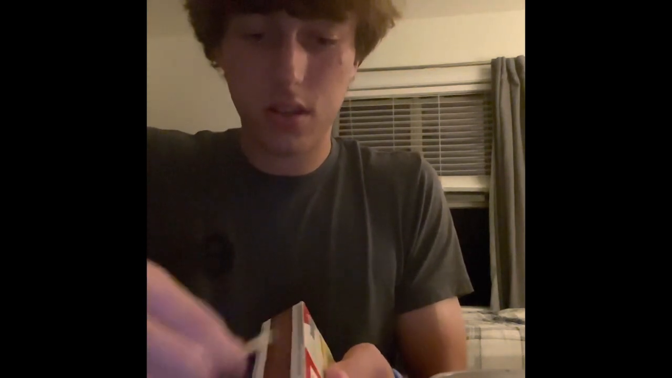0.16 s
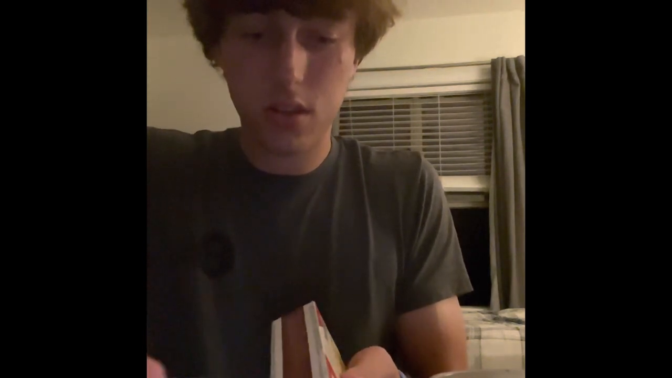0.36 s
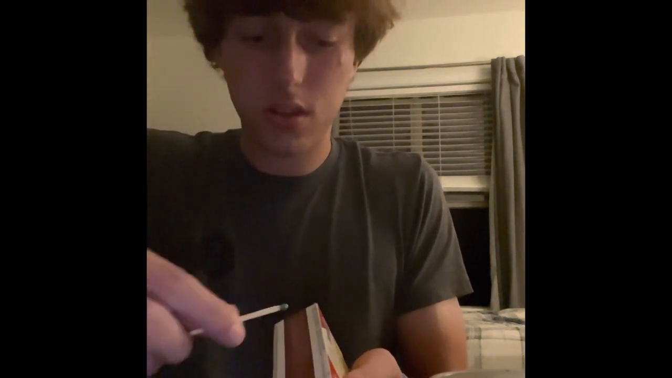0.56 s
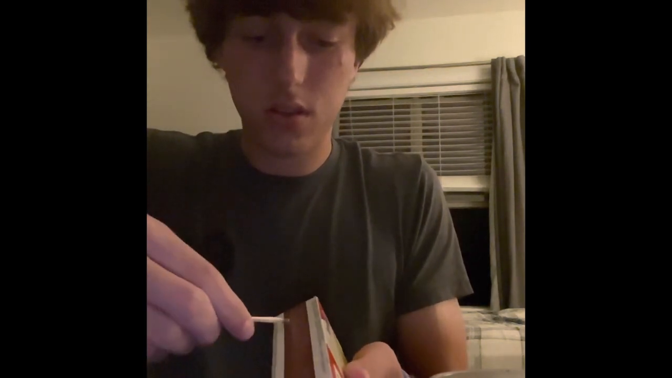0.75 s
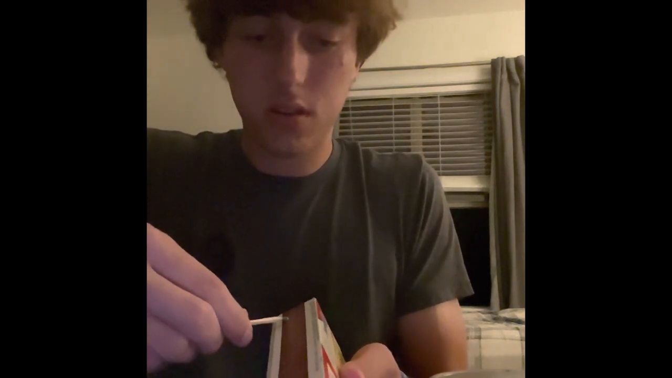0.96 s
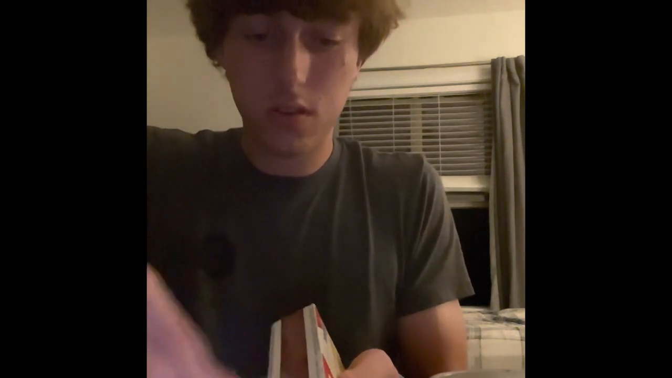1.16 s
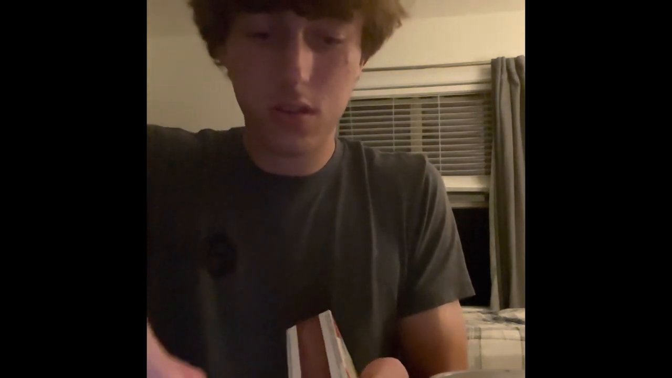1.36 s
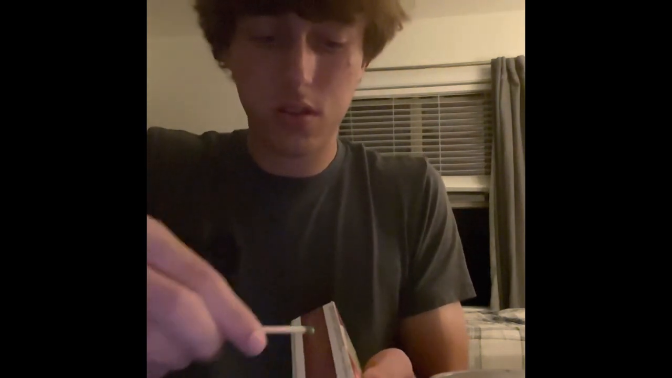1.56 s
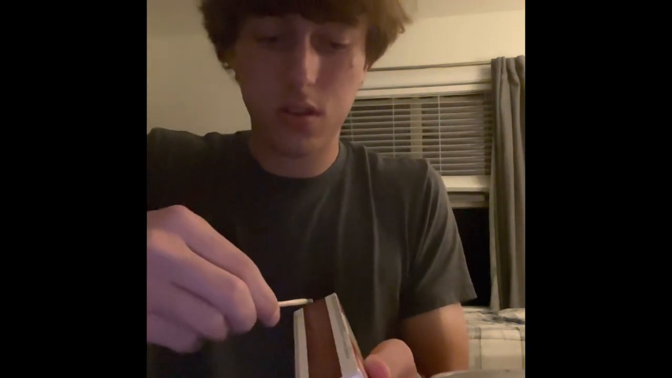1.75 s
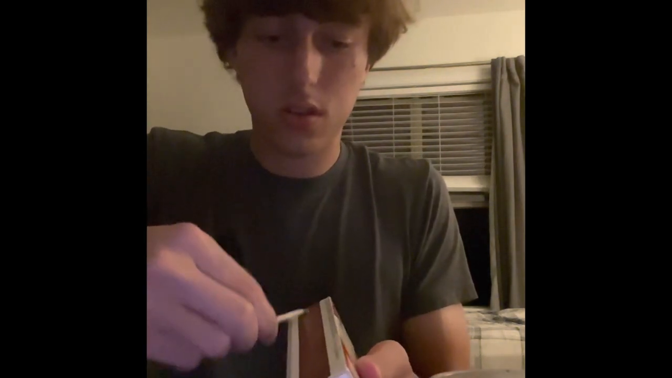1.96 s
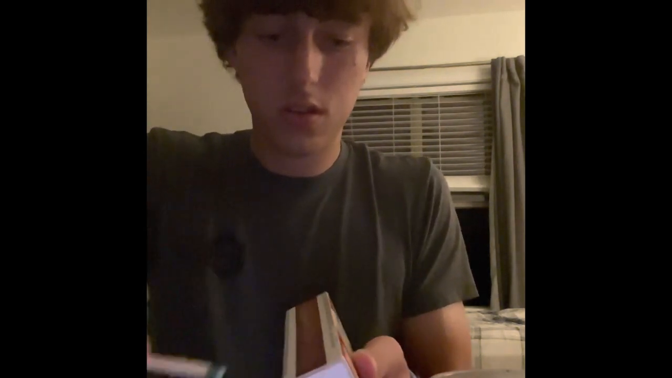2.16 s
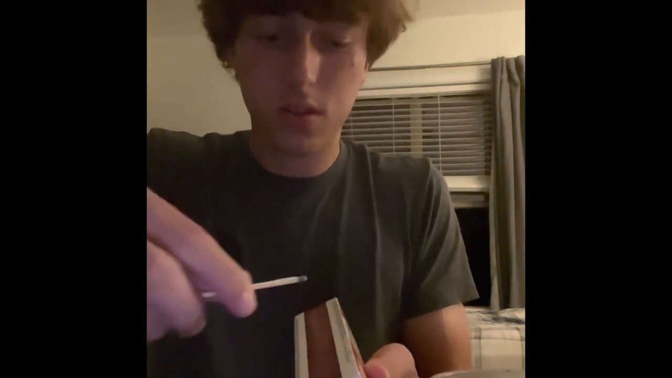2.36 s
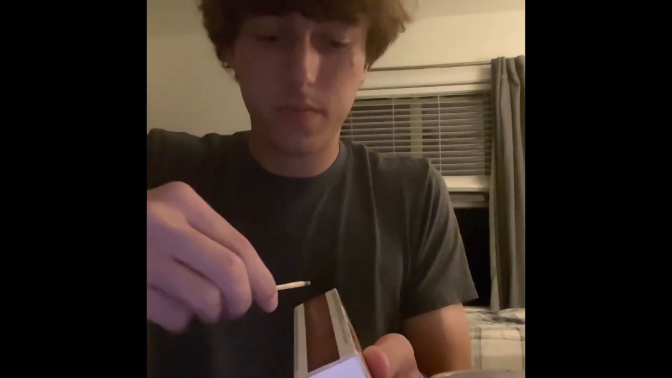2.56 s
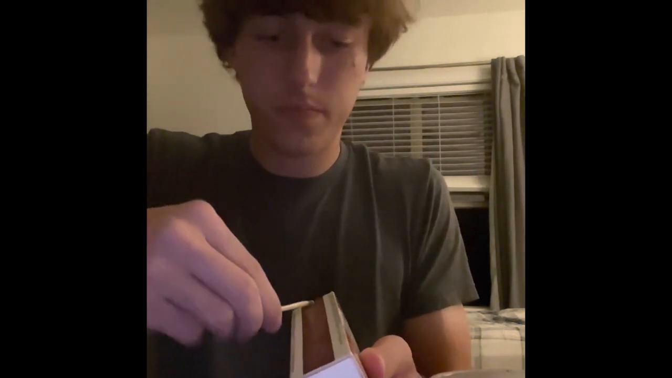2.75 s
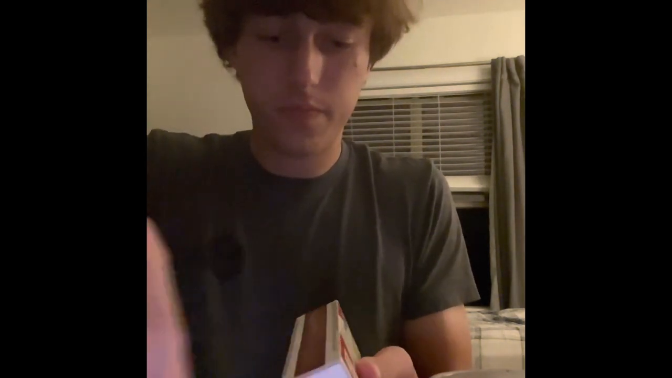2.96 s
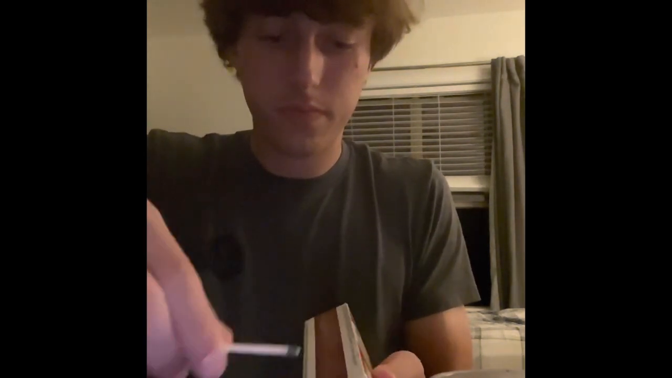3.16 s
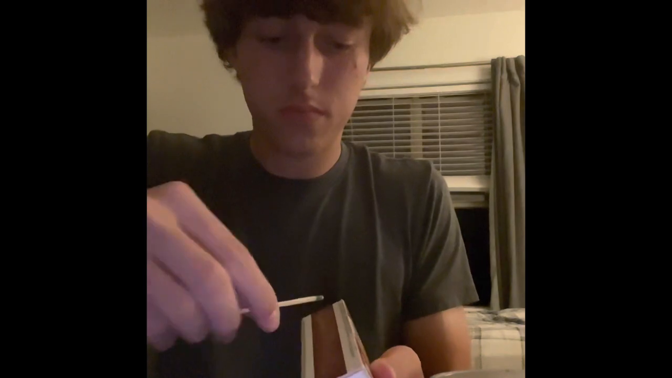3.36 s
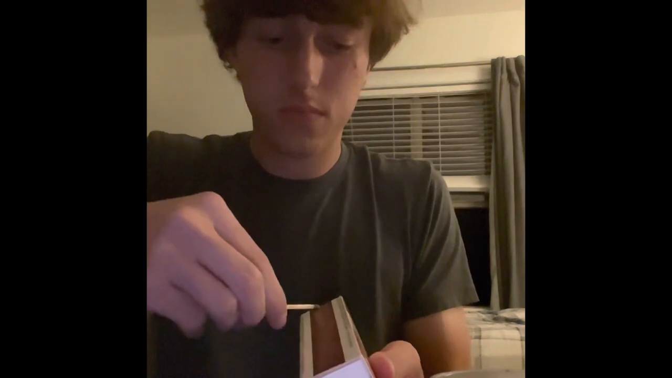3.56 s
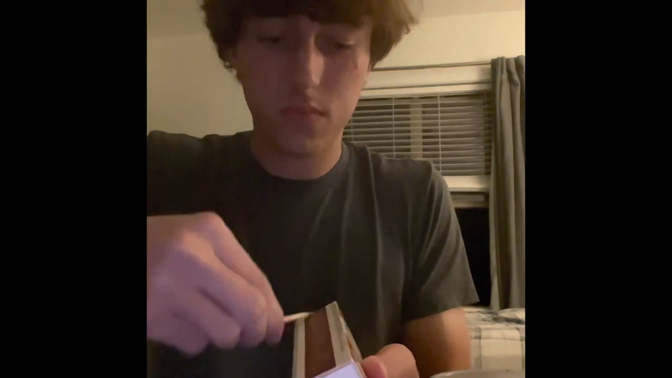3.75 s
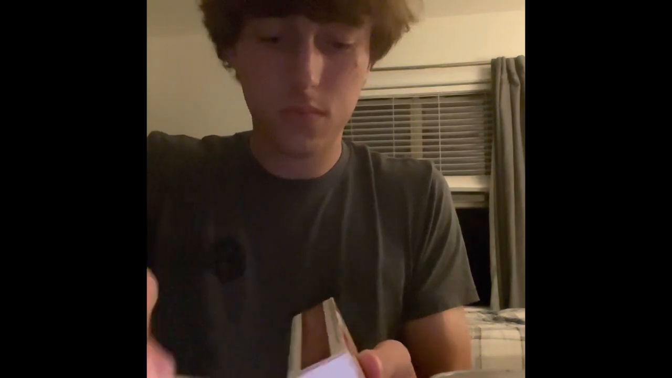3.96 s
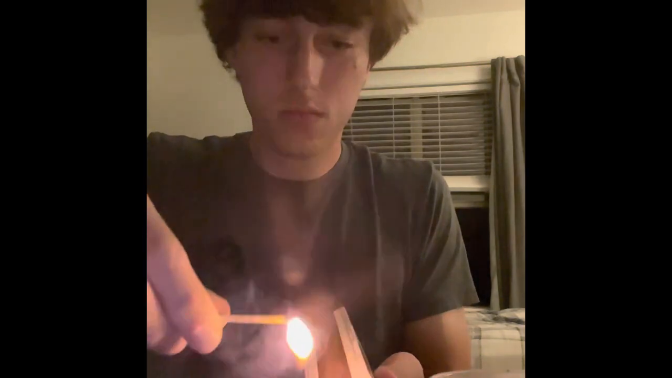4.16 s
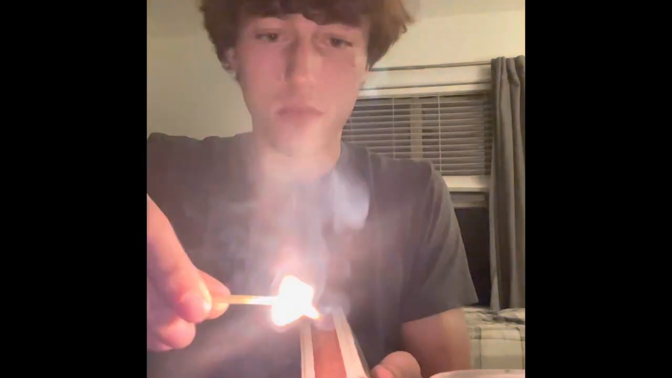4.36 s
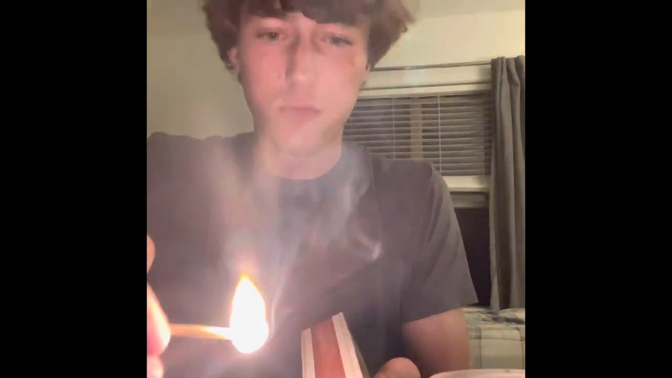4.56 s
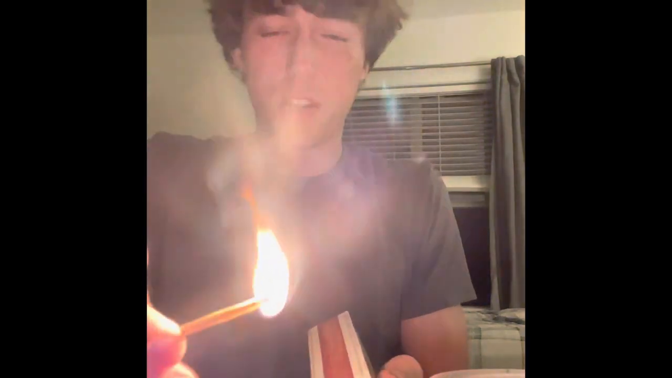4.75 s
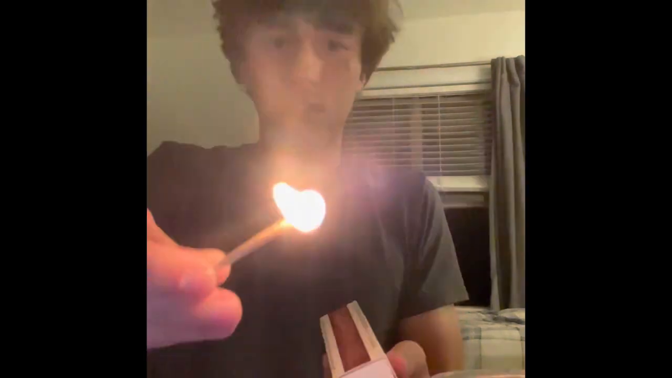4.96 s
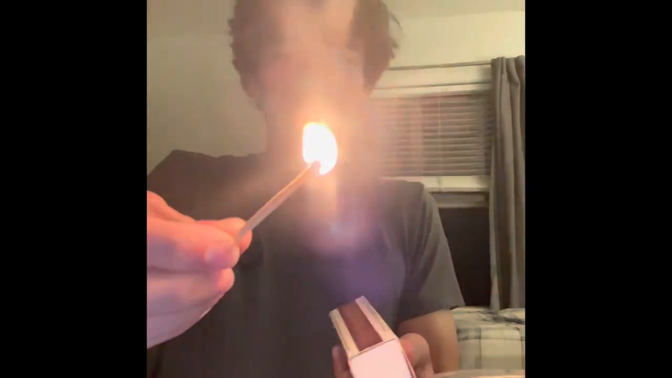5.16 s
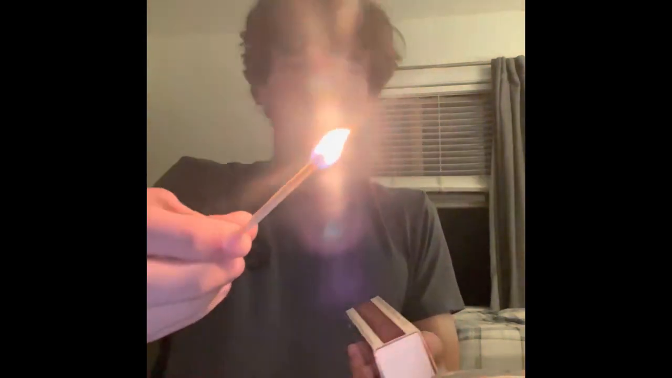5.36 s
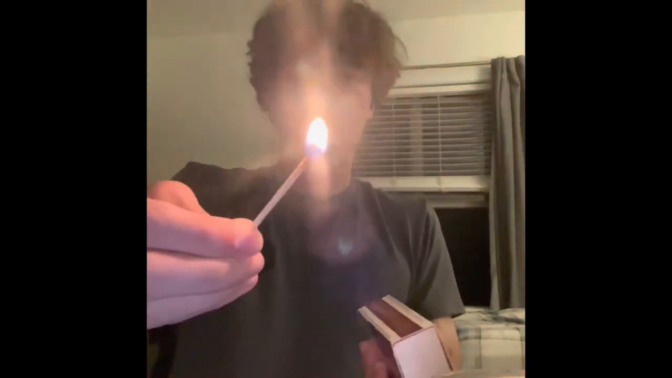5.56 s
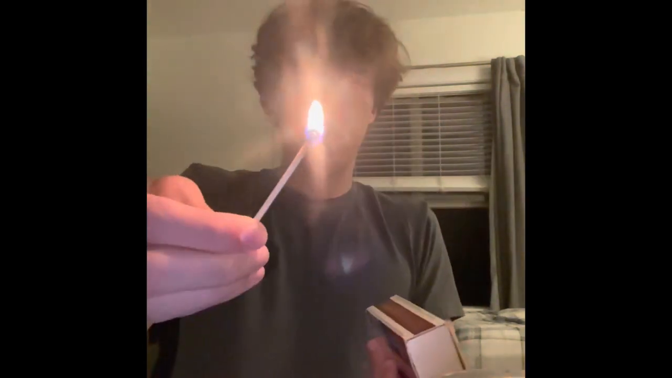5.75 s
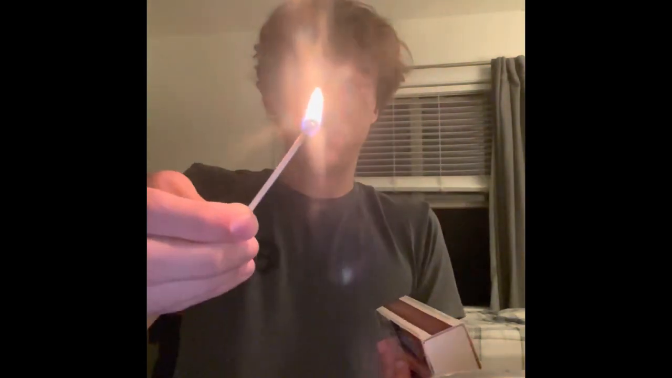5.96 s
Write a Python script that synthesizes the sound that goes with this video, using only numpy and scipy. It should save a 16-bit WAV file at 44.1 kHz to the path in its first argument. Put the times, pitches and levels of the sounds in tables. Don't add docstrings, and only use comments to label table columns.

```python
import sys
import numpy as np
from scipy import signal
from scipy.fft import rfft, irfft
from scipy.io import wavfile
from scipy.ndimage import uniform_filter1d

SR = 44100
rng = np.random.default_rng(int(sys.argv[2]) if len(sys.argv) > 2 else 0)


def generate_wav(signal):
    frames = np.transpose(np.atleast_2d(signal))
    scaled = np.clip(frames, -1, 1) * 32767
    pcm = np.round(scaled).astype(np.int16)
    wavfile.write(sys.argv[1], SR, pcm)


def convert_level_to_amplitude(level_db):
    exponent = np.asarray(level_db, float) / 20
    return 10 ** exponent


N = 264600


def evened(x):
    return x / np.sqrt(np.mean(x ** 2) + 1e-20)


def read(points, hz):
    f, value = np.transpose(points)
    return np.interp(np.log(hz + 1), np.log(f + 1), value)


def drift(per_s):
    t = np.arange(N) / SR
    rates = per_s * np.geomspace(.1, 1, num=8)
    return evened(sum(np.sin(2 * np.pi * (f * t + rng.random())) / np.sqrt(f) for f in rates))


def ring(modes, rise_s=1e-5):
    t = np.arange(2048) / SR
    h = np.zeros(len(t))
    for k, (hz, width_hz, db) in enumerate(modes):
        decay = width_hz * np.exp(-np.pi * width_hz * t)
        h += (-1) ** k * convert_level_to_amplitude(db) * decay * np.sin(2 * np.pi * hz * t)
    h = h * (1 - np.exp(-t / rise_s))
    return h / np.linalg.norm(h)


def noise(colour_db, size, patchy_db, same=lambda hz: 1.):
    frames, hz = 4 * N // size + 5, np.fft.rfftfreq(size, 1 / SR)[:, None]
    a, b, c, d, patches = rng.standard_normal((frames, len(hz), 5)).T
    patches = uniform_filter1d(patches, size=8, axis=0)
    patches = evened(uniform_filter1d(patches, size=10, axis=1))
    likeness = np.clip(same(hz), -1, 1)
    left = a + 1j * b
    right = likeness * left + np.sqrt(1 - likeness ** 2) * (c + 1j * d)
    t = np.arange(frames) * size / 4 / SR
    z = np.array([left, right]) * convert_level_to_amplitude(colour_db(hz, t) + patchy_db * patches)
    return signal.istft(z, nperseg=size, noverlap=3 * size // 4)[1][:, :N]


# pitch_hz, width_hz, lift_db
MIC_CAVITY = (2300, 460, 11.54)


def cavity_db(hz):
    centre_hz, width_hz, lift_db = MIC_CAVITY
    return 10 * np.log10(1 + convert_level_to_amplitude(2 * lift_db) / (1 + (2 * (hz - centre_hz) / width_hz) ** 2) ** 2)


# pitch_hz, level_db (rms), waver_db
COMPRESSOR = (48.3, -59.5, 1.4)


def drone():
    hz, db, waver_db = COMPRESSOR
    turns = np.cumsum(hz + 1.5 * drift(6.)) / SR
    return convert_level_to_amplitude(db + waver_db * drift(5.4)) * np.sqrt(2) * np.sin(2 * np.pi * turns)


# pitch_hz, width_hz, level_db (rms)
HUM_LINES = [(241.36, 1.7, -63.5), (127.4, 8.7, -69.5), (1040, 180, -93.5)]


def hum():
    hz, out = np.fft.rfftfreq(N, 1 / SR), np.zeros(N)
    for f, width_hz, db in HUM_LINES:
        band = rfft(rng.standard_normal(N)) / (1 + (2 * (hz - f) / width_hz) ** 2)
        tone = np.sin(2 * np.pi * np.cumsum(f + drift(3.)) / SR)
        out += convert_level_to_amplitude(db) * evened(evened(irfft(band, N)) + 1.9 * tone)
    return out


# pitch_hz, level_db (per Hz)
AIR_COLOUR = [(30, -20.5), (55, -6), (97, -12.5), (242, -11), (344, -21), (516, -34.5), (1040, -41.5),
              (1520, -49), (2350, -43.5), (3160, -54), (6000, -57), (10000, -60.5), (13000, -67.5),
              (16000, -77.5)]
# pitch_hz, likeness (-1 to 1)
AIR_LIKENESS = [(60, 0.96), (180, 1), (550, -0.58), (1650, 0.31), (4970, 0.17), (15000, 0.27)]
# time_s, treble_lift_db
AIR_STIR = [(0, 2), (2.399, -0.5), (4.899, 6), (6, 2)]


def floor():
    def colour(hz, t):
        stir_db = np.interp(t, *np.transpose(AIR_STIR)) * np.clip(hz / 1000 - 1, 0, 1)
        return read(AIR_COLOUR, hz) + cavity_db(hz) + stir_db

    air = noise(colour, size=1024, patchy_db=.7, same=lambda hz: read(AIR_LIKENESS, hz))
    balance = convert_level_to_amplitude([[.6], [-.6]])
    return convert_level_to_amplitude(-58.5) * evened(air) * balance + hum() + drone()


# pitch_hz, t60_s
ROOM_DECAY = [(300, 0.42), (1000, 0.36), (3000, .3), (7000, 0.26), (11500, .2), (14000, 0.07)]


def room(x):
    taps = np.zeros((2, SR // 2))
    at = np.arange(200, SR // 2 - 20, 20) + rng.integers(0, 20, (2, (SR // 2 - 201) // 20))
    np.put_along_axis(taps, at, rng.choice([-1., 1.], at.shape), 1)
    taps[1] = .4 * taps[0] + .92 * taps[1]
    hz, t, z = signal.stft(taps, SR, nperseg=256)
    fade_db = -60 * t / read(ROOM_DECAY, hz)[:, None]
    tail = signal.istft(z * convert_level_to_amplitude(fade_db), SR, nperseg=256)[1]
    return signal.fftconvolve(x[None], tail / np.linalg.norm(tail[0]), axes=1)[:, :N]


# pitch_hz, left_lead_rad
PORT_LEAD = [(100, 0), (1120, -.4), (2400, .6), (3100, -.6), (4450, .6), (4820, -1.2), (5500, 1.1),
             (6900, .2), (8500, 1), (10500, 1.8), (12800, 2.7), (16200, 2.75)]
# pitch_hz, left_over_right_db
PORT_TILT = [(100, -0.5), (380, 2.5), (700, 6), (1290, 3.5), (2380, -0.5), (15000, 1)]


def ports(x):
    hz = np.fft.rfftfreq(N, 1 / SR)
    half = convert_level_to_amplitude(read(PORT_TILT, hz) / 2) * np.exp(.5j * read(PORT_LEAD, hz))
    return irfft(rfft(x) * np.array([half, 1 / half]), N)


# pitch_hz, width_hz, level_db
GRIT_MODES = [(3990, 810, 3.5), (4750, 2700, -2.5), (5930, 630, 1), (7220, 620, -5.5), (9300, 1500, -4.5),
              (13000, 2000, -6), (15000, 240, -15.5)]


def knocks(rows, body, click, crumble_s, boom_width_hz, lift_db):
    out, u = np.zeros(N), np.arange(400) / SR
    crumble = rng.standard_normal((len(rows), len(u))) * np.exp(-u / crumble_s) + click * (u == 0)
    for (s, db, bright_db, boom_db, boom_hz), burst in zip(rows, crumble):
        boom = ring([(boom_hz, boom_width_hz, 0), (0.4 * boom_hz, 300, -19)])
        response = ring(body, rise_s=0.00092) + convert_level_to_amplitude(bright_db) * ring(GRIT_MODES) + convert_level_to_amplitude(boom_db) * boom
        sound = convert_level_to_amplitude(db + lift_db) * np.convolve(burst / np.linalg.norm(burst), response)
        out[round(s * SR):][:len(sound)] += sound
    return out


# start_s, level_db (peak), bright_db, boom_db, boom_hz
BOX_CREAKS = [
    (3.1757, -57, -27, 5, 633),
    (3.1966, -53.5, -23.5, -2, 640),
    (3.2824, -59.5, -22, 8, 623),
    (3.2969, -55.5, -36, -2.5, 670),
    (3.6611, -62.5, -25, 6, 735),
    (3.6674, -60.5, -25.5, 7, 700),
    (3.6924, -63, -15, 17.5, 705),
    (4.9232, -56, -11, 8, 1203),
]
# pitch_hz, width_hz, level_db
CAVITY_SNAP = [(1150, 700, -12), (1813, 380, -3), (2300, 270, 10)]


def creaks():
    return knocks(BOX_CREAKS, CAVITY_SNAP, click=0.84, crumble_s=0.0054, boom_width_hz=52, lift_db=16.0)


# start_s, level_db (peak), bright_db, boom_db, boom_hz
HEAD_SPARKS = [
    (3.9496, -50.5, 7, -16, 606),
    (4.8693, -44.5, -36.5, -20, 875),
    (5.1108, -45.5, -3.5, -41, 754),
    (5.31, -32, -24, -8.5, 810),
    (5.5234, -46, -30.5, -21, 566),
]


def sparks():
    return knocks(HEAD_SPARKS, CAVITY_SNAP, click=10., crumble_s=0.0004, boom_width_hz=1300, lift_db=13.0)


# time_s, level_db
BURN = [
    (3.859, -45.5),
    (3.9, -49.5),
    (4.06, -48),
    (4.22, -52.5),
    (4.41, -46.5),
    (4.64, -49),
    (4.795, -52.5),
    (4.81, -70.5),
    (4.865, -73.5),
]
# pitch_hz, level_db (per Hz)
HISS_COLOUR = [(700, -27.5), (1200, -25.5), (1700, -12.5), (2300, -8), (3250, -20.5), (3800, -13),
               (5500, -19.5), (9900, -21.5), (12600, -31), (14000, -55), (16000, -72)]
# pitch_hz, level_db (per Hz)
ROAR_COLOUR = [(35, -33.5), (60, -4), (291, -5.5), (512, -9), (556, -7.5), (783, -13), (976, -8.5),
               (1600, -18), (2080, -46.5), (3520, -120)]
# pitch_hz, lift_db
HISS_AIR = [(7000, -3.5), (11000, -1), (13500, 14), (16000, 24)]
# time_s, delay_ms
TABLE_ECHO = [(4.0, .405), (4.2, .425), (4.4, .44), (4.5, .45), (4.65, .475), (4.8, .51)]


def flare():
    s, db = np.transpose(BURN)
    tremor = drift(12.)

    def hiss_colour(hz, t):
        shake_ms = .006 * tremor[np.minimum(t * SR, N - 1).astype(int)]
        delay_ms = np.interp(t, *np.transpose(TABLE_ECHO)) + shake_ms
        turn = 2 * np.pi * hz * delay_ms / 1000
        echo = .6 / (1 + (3000 / (hz + 1)) ** 2)
        comb = abs(1 - echo * np.exp(-1j * turn))
        comb *= abs(1 + 0.19 * np.exp(-2.6j * turn))
        burn_db = np.interp(t, s, db)
        top = np.clip(hz / 4000 - 1.4, 0, 1)
        fizz_db = top * (1 - 0.97 * np.clip(burn_db - db.max() + 6, -4, 4))
        colour = read(HISS_COLOUR, hz) + read(HISS_AIR, hz) + cavity_db(hz)
        return colour + 20 * np.log10(comb) + fizz_db + np.interp(t, s, db, -120, -120)

    t = np.arange(N) / SR
    flicker = convert_level_to_amplitude(.8 * evened(uniform_filter1d(rng.standard_normal(N), size=500)))
    hiss = convert_level_to_amplitude(-3.5) * noise(hiss_colour, size=512, patchy_db=1.)[0]
    roar = evened(noise(lambda hz, t: read(ROAR_COLOUR, hz), size=1024, patchy_db=-1.47)[0])
    roar_db = -53 + np.interp(t, s, 0.9 * (db - np.median(db)), -70, -70)
    return flicker * (hiss + roar * convert_level_to_amplitude(roar_db))


# start_s, level_db (peak), bright_db, boom_db, boom_hz
HEAD_TAPS = [
    (1.277, -36.5, -28, -7.5, 940),
    (1.8003, -33, -26, -9, 718),
    (2.7008, -27.5, -22, -16, 697),
    (3.5548, -28, -16.5, -17.5, 720),
    (3.5793, -47, -9, -12.5, 736),
]
# pitch_hz, width_hz, level_db
STICK_MODES = [(1130, 75, -16), (1700, 250, -19), (2170, 170, -0.5), (2940, 140, -4.5), (4550, 3200, -13),
               (6430, 490, -23.5)]


def taps():
    return knocks(HEAD_TAPS, STICK_MODES, click=13.0, crumble_s=0.0001, boom_width_hz=42, lift_db=15.0)


# start_s, level_db (peak), pitch_hz
BOX_THUMPS = [(0.004, -45.5, 600), (3.179, -49.5, 1150), (3.935, -31.5, 420), (1.158, -33, 335),
              (2.908, -25.5, 329), (2.94, -27.5, 330), (0.18, -18.5, 1040), (1.803, -41, 722),
              (2.037, -18, 754), (2.702, -44, 683), (2.936, -12, 739.6), (3.198, -47.5, 678),
              (3.667, -43.5, 713), (3.849, -10.5, 769.5), (4.924, -65, 1197), (4.925, -44, 556)]


def thumps():
    width_hz, rise_s = 170, .0004
    out, u = np.zeros(N), np.arange(2048) / SR
    envelope = (1 - np.exp(-u / rise_s)) * np.exp(-np.pi * width_hz * u)
    for s, db, hz in BOX_THUMPS:
        swing = envelope * np.sin(2 * np.pi * hz * u)
        out[round(s * SR):][:len(u)] += convert_level_to_amplitude(db + 1.5) * swing
    return out


# start_s, level_db (peak)
GRAIN_CRACKS = [(0.1635, -20), (0.18, -16.5), (0.188, -18), (0.2014, -28.5), (0.4269, -57.5), (1.0947, -27),
                (1.1132, -23.5), (1.1521, -17), (1.1694, -32.5), (1.3175, -49), (2.0338, -19.5),
                (2.8852, -24), (2.8988, -12.5), (2.9016, -16.5), (2.9047, -15), (2.9066, -10.5),
                (2.9168, -21.5), (3.2234, -64), (3.8006, -20), (3.8243, -14.5), (3.8328, -14.5),
                (3.8367, -8), (3.8426, -20), (3.9519, -28)]
# pitch_hz, width_hz, level_db
RASP_MODES = [(1470, 230, -3.5), (1990, 340, -2), (2306, 130, 5.5), (2565, 150, 0), (2964, 140, -0.5),
              (3240, 200, -7.5)]
# pitch_hz, width_hz, level_db
BOX_MODES = [(633, 120, -0.5), (735, 120, 1.5), (1030, 90, 3), (1160, 420, -6.5), (314, 1600, -29)]


def cracks():
    drive, u = np.zeros(N), np.arange(100) / SR
    dust = rng.standard_normal((len(GRAIN_CRACKS), len(u))) * np.exp(-u / 0.0012) + 7.5 * (u == 0)
    for (s, db), burst in zip(GRAIN_CRACKS, dust):
        drive[round(s * SR):][:len(u)] += convert_level_to_amplitude(db + 11.5) * burst / np.linalg.norm(burst)
    return signal.oaconvolve(drive, ring(GRIT_MODES) + convert_level_to_amplitude(-7) * ring(RASP_MODES + BOX_MODES))[:N]


def grit_of(pressure_db):
    firm_db, light_db = -30, -52
    return 0.82 * (np.maximum(pressure_db, light_db) - firm_db)


# start_s, level_db (peak), boom_db, boom_hz
STRIP_SNAGS = [(0.1226, -35, 1, 985), (0.1495, -16.5, -28, 735), (0.1811, -8.5, -19, 986),
               (0.2002, -10, -23.5, 1030), (0.772, -24, 0.5, 693), (0.8019, -26.5, -15.5, 660),
               (0.8138, -24.5, 6.5, 663), (0.9464, -16.5, -16.5, 630), (0.9662, -25.5, -4.5, 629),
               (1.099, -28.5, -9.5, 698), (1.1264, -32, -8.5, 930), (1.1503, -11.5, -0.5, 817),
               (1.9597, -29, -8.5, 620), (1.9869, -15.5, -11, 1108), (1.9907, -22, -9.5, 732),
               (2.004, -17, -10, 773), (2.0265, -29.5, -17.5, 748), (2.8701, -19.5, -26, 733),
               (2.8854, -19.5, -10.5, 938), (2.8976, -20.5, -9, 782), (2.9067, -14, 1.5, 752),
               (2.9367, -10.5, 9, 1040), (3.7694, -30.5, -20, 1070), (3.785, -17, -15, 612),
               (3.8016, -9, -16, 794), (3.8228, -17.5, 3.5, 708), (3.8349, -13, 2, 654),
               (3.847, -20, -8, 674), (3.906, -26, 4, 1105), (3.9133, -17, -6, 1178)]


def snags():
    start, _, _, pressure_db, _ = np.transpose(STRIP_STROKES)
    rows = []
    for s, db, boom_db, boom_hz in STRIP_SNAGS:
        bright_db = -19 + grit_of(pressure_db[start <= s][-1])
        rows.append((s, db, bright_db, boom_db, boom_hz))
    return knocks(rows, RASP_MODES, click=3.9, crumble_s=0.0015, boom_width_hz=140, lift_db=7.5)


# start_s, rise_s, hold_s, pressure_db, pressure_change_db (over the hold)
STRIP_STROKES = [
    (0.0, .002, .025, -58.5, -15.5),
    (0.111, .04, 0.05, -29, -0.5),
    (0.766, 0.0025, 0.011, -45, 0),
    (0.787, .01, .032, -40, -3.5),
    (0.938, 0.0086, .08, -36.5, -9),
    (1.077, .03, .067, -28.5, -2.5),
    (1.947, .038, 0.051, -28.5, 1.5),
    (2.819, .05, .068, -30.5, 3),
    (3.752, .04, 0.053, -28.5, 2),
    (4.915, .003, .08, -78, -1),
]
# start_s, rise_s, hold_s, pressure_db, pressure_change_db
HEAD_SKIDS = [
    (1.802, .003, 0.023, -49, -12),
    (2.701, 0.0023, 0.058, -57, -13),
    (3.543, 0.01, 0.036, -57, -6),
    (3.655, .005, 0.02, -67.5, 1),
    (2.786, .003, .01, -59, -5),
    (5.312, 0.0028, 0.02, -74, -8.5),
]


def contact():
    t, levels = np.arange(N) / SR, np.zeros((3, N))
    moves = [(row, 0) for row in STRIP_STROKES] + [(row, 9.5) for row in HEAD_SKIDS]
    for (start, rise, hold, db, change_db), extra_grit_db in moves:
        u = t[(t >= start) & (t < start + rise + hold + .06)] - start
        along = np.minimum(u / (rise + hold), 1)
        build_db = -23 * np.clip(1 - u / rise, 0, 1) ** 1.3
        lift_off_db = -1099.5 * np.maximum(u - rise - hold, 0)
        level = db + build_db + change_db * np.clip((u - rise) / hold, 0, 1) + lift_off_db
        grit_db = -13.5 + grit_of(db) + 7 * along + extra_grit_db
        boom_db = -5.5 + 0.2 * grit_of(db) + 4 * (2 * along - 1) ** 2
        first = int(np.ceil(start * SR))
        landing = np.minimum(u / .003, 1)
        levels[:, first:first + len(u)] += landing * convert_level_to_amplitude([level, level + grit_db, level + boom_db])
    return levels


def strokes():
    grains_per_s, spread_db, slip_db = 7000, 6.0, 4.0
    size = convert_level_to_amplitude(spread_db * np.minimum(rng.exponential(1, N), 3)) * (rng.random(N) < grains_per_s / SR)
    slips = convert_level_to_amplitude(slip_db * np.tanh(evened(uniform_filter1d(rng.standard_normal(N), size=150))))
    flicks = size * rng.choice([-1, 1], N) * slips
    grains = convert_level_to_amplitude(-1.5) * evened(flicks + 0.35 * rng.standard_normal(N))
    families = RASP_MODES, GRIT_MODES, BOX_MODES
    return sum(signal.oaconvolve(level * grains, ring(modes))[:N] for level, modes in zip(contact(), families))


def scene():
    box = strokes() + snags() + creaks() + cracks() + thumps()
    flame = sparks() + flare()
    tapping = taps()
    wet = convert_level_to_amplitude(-14.0) * box + convert_level_to_amplitude(-20) * tapping + convert_level_to_amplitude(-15) * flame
    return ports(box + tapping + flame) + room(wet) + floor()


def band_limit(x):
    return signal.sosfilt(signal.butter(12, 16620, fs=SR, output="sos"), x)


def record(dry):
    low_cut = signal.butter(8, 41, "high", fs=SR, output="sos")
    mix = signal.sosfilt(low_cut, dry)
    return band_limit(mix)


dry = scene()
out = record(dry)
generate_wav(out)
```